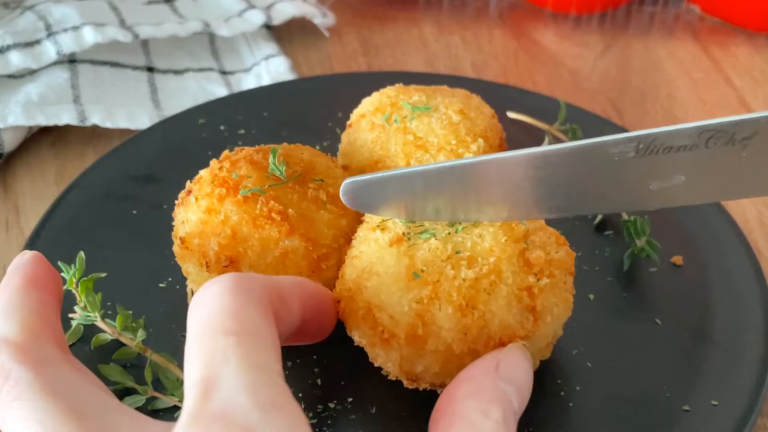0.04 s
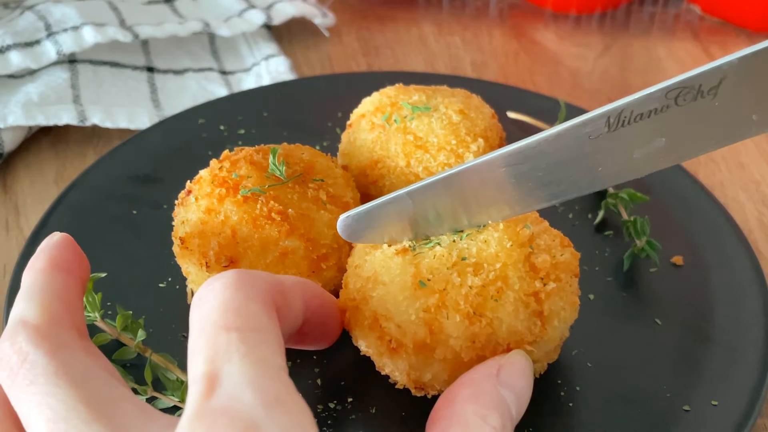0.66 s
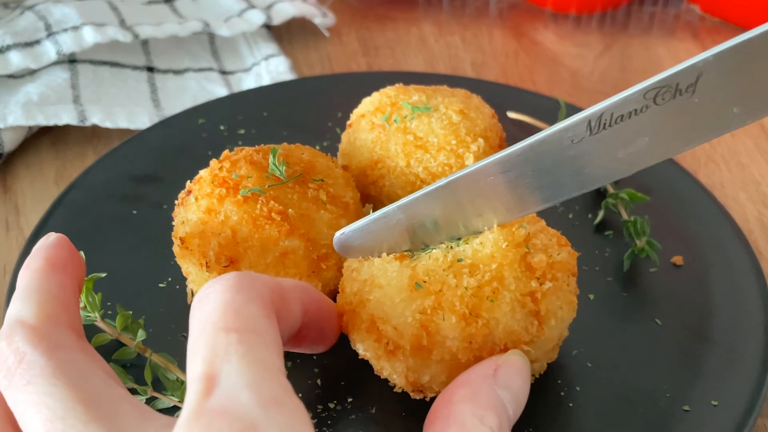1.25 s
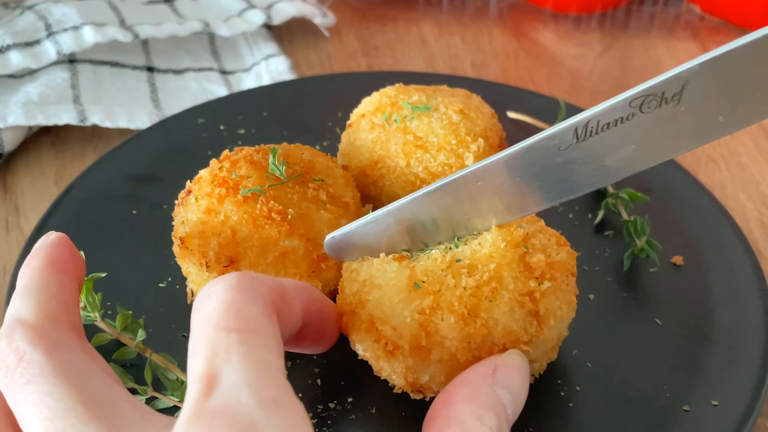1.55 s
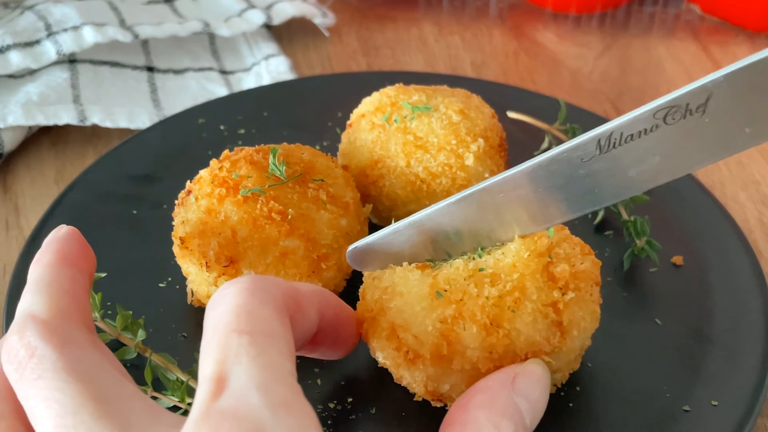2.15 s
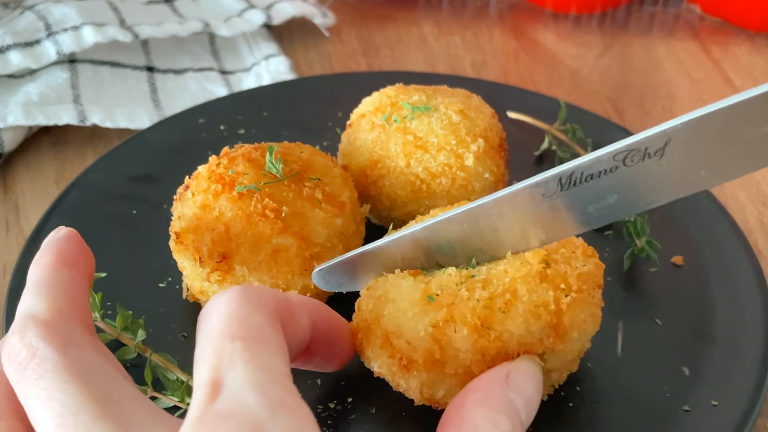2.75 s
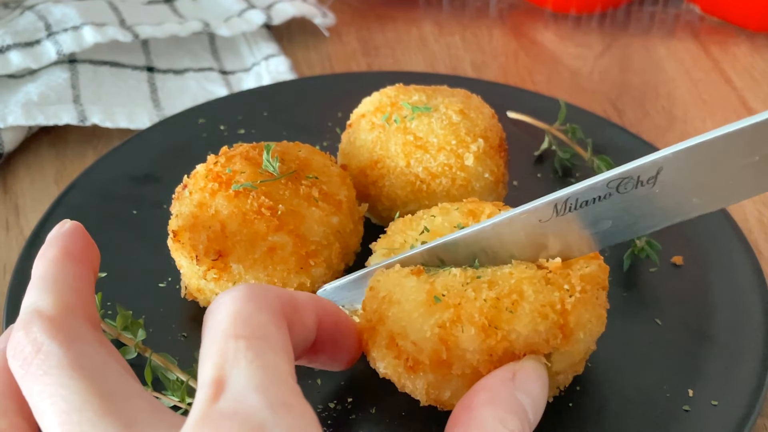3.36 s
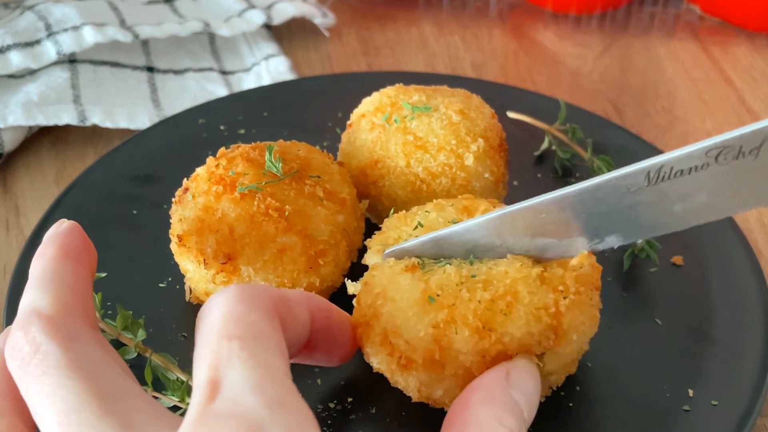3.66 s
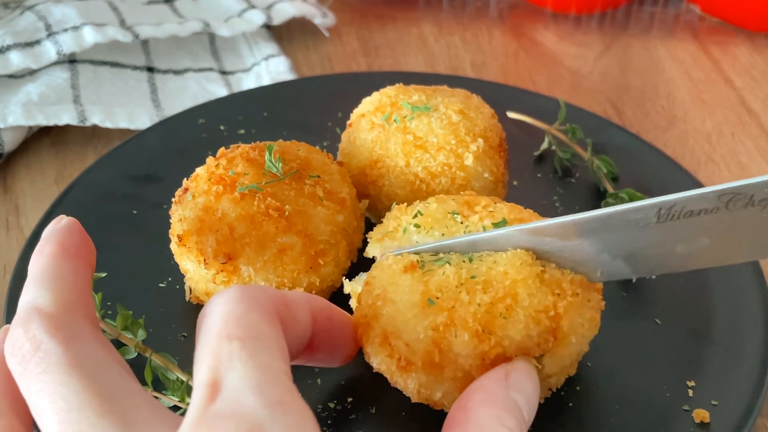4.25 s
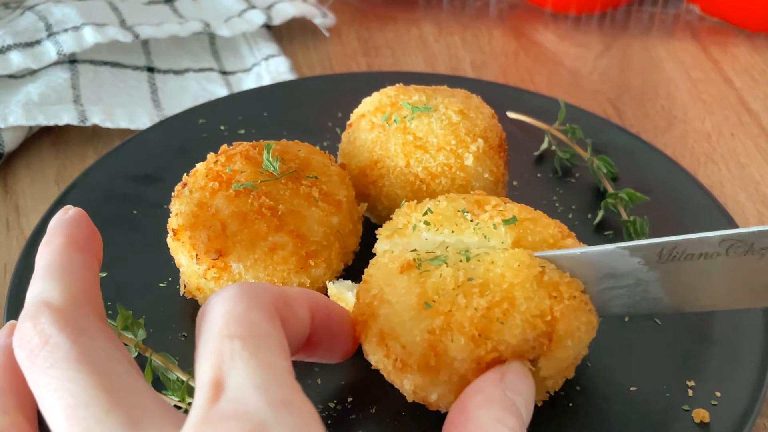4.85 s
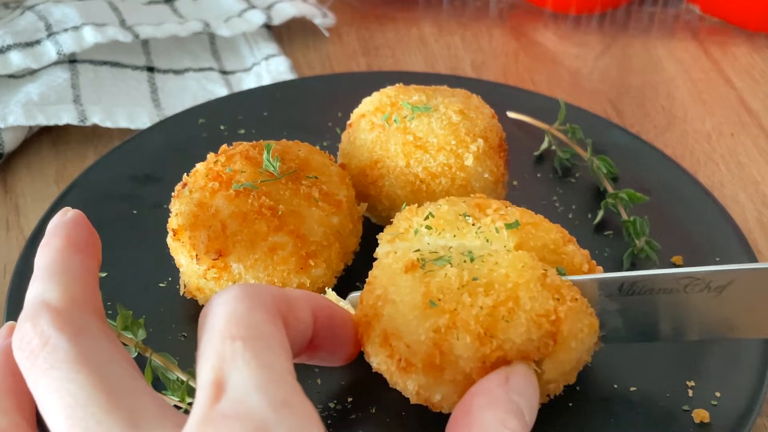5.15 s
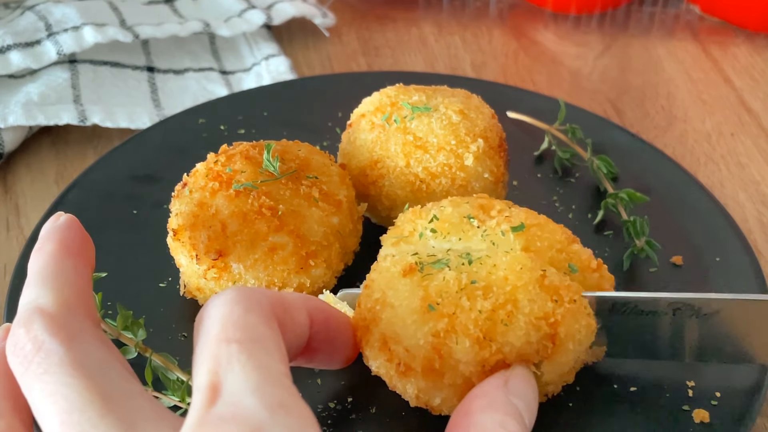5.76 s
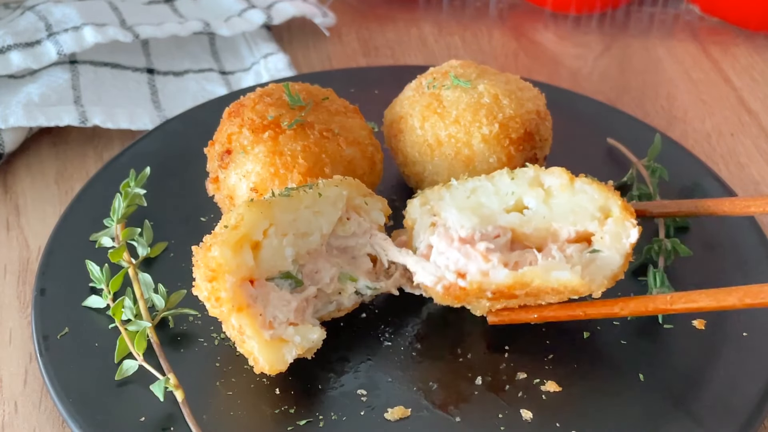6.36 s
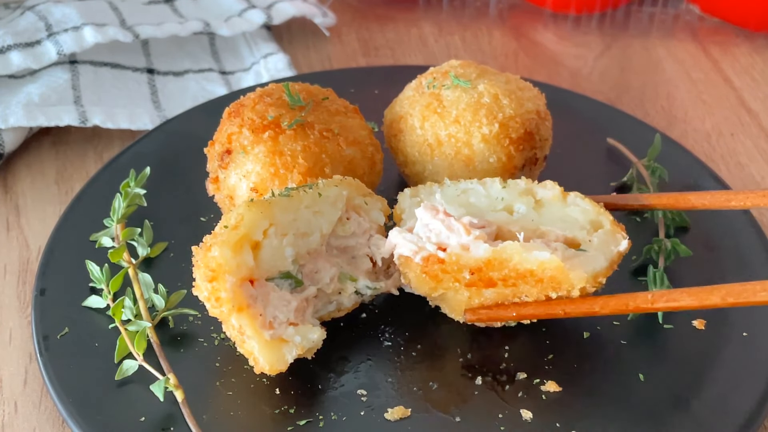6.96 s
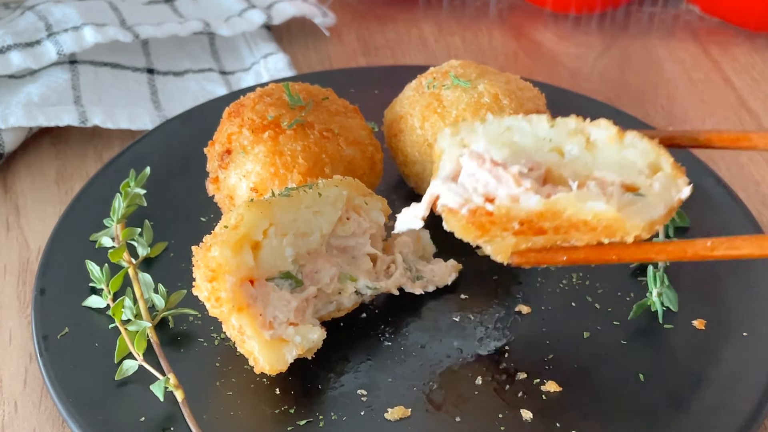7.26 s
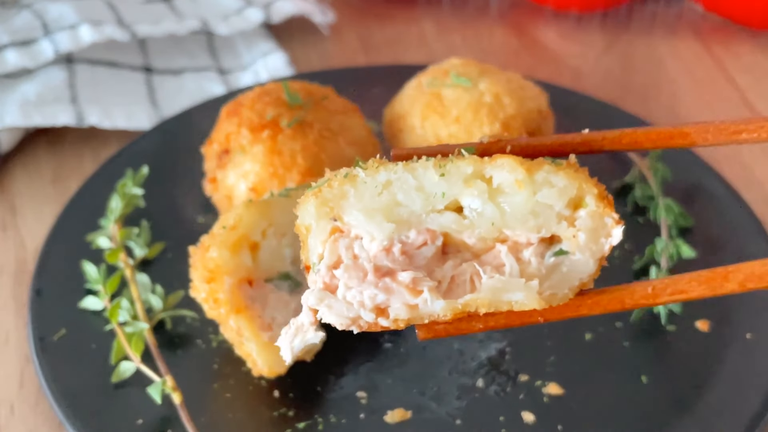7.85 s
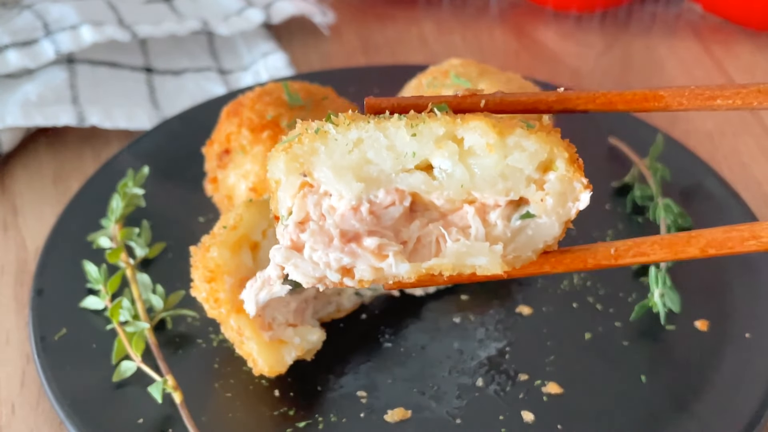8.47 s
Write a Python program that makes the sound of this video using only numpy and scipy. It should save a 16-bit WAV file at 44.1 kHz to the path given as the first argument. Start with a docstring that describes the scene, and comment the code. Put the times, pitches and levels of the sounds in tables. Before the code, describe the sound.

Close crunching of a breadcrumb crust under a knife, a scrape and clack on a ceramic plate, then soft sticky clicks of filling.

```python
"""A table knife saws through a breadcrumbed fried snack on a ceramic plate, very close.
The crust crackles and snaps as its flakes fracture; the blade rings faintly and its teeth rasp.
Each push rocks the table into a low boom. The blade drags on the plate, then clacks against it.
After a brief dropout, chopsticks tug the moist filling apart with sticky clicks, then tick.
Quiet room noise lies underneath."""
import sys
import numpy as np
from scipy import signal
from scipy.fft import rfft, irfft
from scipy.io import wavfile
from scipy.ndimage import uniform_filter1d

SR = 44100
rng = np.random.default_rng(int(sys.argv[2]) if len(sys.argv) > 2 else 0)


def pcm_store(signal):
    """Save signal as 16-bit PCM."""
    levels = np.round(np.clip(np.atleast_2d(signal), -1, 1) * 32767)
    wavfile.write(sys.argv[1], SR, levels.astype(np.int16).T)


N = 384047
TIME_S = np.arange(N) / SR
TAIL_S = np.arange(SR // 3) / SR
DROPOUT_START_S, DROPOUT_END_S = 5.904, 6.012


# start_s, length_s, crackle_db, tilt_db_per_octave, boom_db
KNIFE_STROKES = [(0.11, 0.028, -67.5, -3, -56), (0.22, 0.057, -68.5, -3.5, -87),
                 (0.33, 0.21, -72, 11, -58.5), (0.535, 0.11, -63, -1, -70.5), (0.68, 0.18, -67, -2.5, -62),
                 (0.9, 0.12, -75, 0, -78), (1.035, 0.12, -64.5, 2, -64), (1.29, 0.04, -63, -0.5, -65),
                 (1.42, 0.02, -56.5, -0.5, -54.5), (1.51, 0.071, -66, 1, -47), (1.73, 0.074, -67, 1.5, -87),
                 (1.87, 0.047, -63, -1, -62.5), (2.07, 0.38, -67.5, -1, -61), (2.31, 0.15, -57, -1, -43.5),
                 (2.5, .11, -57, 0, -44), (2.655, 0.067, -53, 0.5, -49.5), (2.915, 0.1, -56, -1.5, -54.5),
                 (3.095, 0.11, -58, -2.5, -47.5), (3.26, 0.075, -45, -4, -39.5),
                 (3.49, 0.13, -55, -1.5, -56), (3.725, 0.13, -50, -2, -47), (3.83, 0.18, -49, 1.5, -39.5),
                 (4.1, 0.11, -58, 0.5, -59), (4.365, 0.17, -47, 1.5, -39.5), (4.71, 0.13, -60.5, 0, -49.5),
                 (4.87, 0.39, -62.5, 1.5, -47), (5.035, 0.16, -53.5, 0.5, -56), (5.26, 0.38, -61, 2, -56.5),
                 (5.51, 0.12, -48.5, -2, -42.5), (5.76, 0.22, -63.5, 1, -53.5)]
# blade resting in the crust: time_s, crackle_db
REST_CRACKLE = [(0.1, -81.5), (1.5, -77.5), (2.3, -69), (5.8, -69.5)]
# freq_hz, density_db
CRUMB_SPECTRUM = [(100, -25), (480, -2.5), (750, -7), (1150, -3), (1950, -2), (3500, 3.5), (4300, -4.5),
                  (6100, -5), (7400, -7.5), (9500, -9), (11000, -17), (16000, -21)]

def crust():
    """Crumbs fracture under each stroke, and faintly under the resting blade."""
    return amp(-1.5) * crackle(KNIFE_STROKES, CRUMB_SPECTRUM, rate_per_s=1250, crowding=0.98,
                               spread_db=5, resonance_db=6.5, size_tilt=1.96,
                               rest=resting(curve(REST_CRACKLE)))


def crackle(moves, spectrum, rate_per_s, crowding, spread_db, resonance_db, size_tilt, rest=0):
    """Clumps of tiny fractures; more force breaks more pieces, and small ones sound brighter."""
    clumps = np.interp(TIME_S * 55, np.arange(2000), rng.uniform(-1, 1, 2000))  # 55 per second
    level = np.hypot(effort(moves), rest) * amp(3 * clumps)
    chance = rate_per_s * (level / amp(-58.5)) ** crowding / SR
    breaks = (rng.random(N) < chance) * rng.choice([-1, 1], N)
    breaks = breaks * amp(spread_db * np.minimum(rng.exponential(1, N), 4))
    clicks = []
    for pitch_hz in np.geomspace(800, 12000, 48):
        click = fragment(spectrum, pitch_hz, size_tilt * octaves(pitch_hz), resonance_db)
        clicks.append(unit_rms(np.convolve(click, fracture(crumble_ms=1, splintering=0.72))))
    kind, grains = rng.integers(0, len(clicks), N), np.zeros(N)
    for i in np.flatnonzero(breaks):
        add(grains, i / SR, breaks[i] * clicks[kind[i]])
    hz, frame_s, frames = signal.stft(grains, SR, nperseg=256)
    start_s, length_s, _, tilt, _ = np.transpose(moves)
    frames *= amp(octaves(hz)[:, None] * np.interp(frame_s, start_s + length_s / 2, tilt))
    tilted = signal.istft(frames, SR, nperseg=256)[1][:N]
    return level * steadied(tilted, window_s=0.025)


def fracture(crumble_ms, splintering):
    """The force of a break: one sharp release, then a dying cluster of splinters."""
    t_ms = 1000 * np.arange(SR // 50) / SR
    splinters = rng.standard_normal(len(t_ms)) * np.exp(-t_ms / crumble_ms)
    splinters[:4] = 0
    force = unit_energy(splinters) * splintering * (crumble_ms + 0.8)
    force[0] = -1
    return force


def fragment(spectrum, pitch_hz, tilt_db_per_octave, resonance_db):
    """The click of a flake or shred: a broad spectrum with one short resonance."""
    hz = np.fft.rfftfreq(2048, 1 / SR)
    resonance = np.exp(-(np.log2((hz + 1) / pitch_hz) / 0.42) ** 2)
    db = spectrum_db(spectrum, hz) + tilt_db_per_octave * octaves(hz) + resonance_db * resonance
    log_gain = np.log(amp(np.r_[db, db[-2:0:-1]]))
    minimum_phase = np.exp(np.conj(signal.hilbert(log_gain)))[:len(hz)]
    return unit_energy(irfft(minimum_phase)[:512])


# start_s, level_db, pitch_hz, crumble_ms
SNAPS_AND_CLICKS = [(0.377, -57.5, 1140, 2.9), (0.42, -61.5, 2680, 1.7), (0.4844, -54.5, 3260, 1.1),
                    (0.5232, -50.5, 2220, 3.9), (0.5547, -58, 970, 0.94), (0.614, -57, 6260, 1.2),
                    (0.682, -54, 1590, 4.1), (0.731, -55, 1530, 1.8), (0.746, -54.5, 1650, 1.9),
                    (0.8176, -48.5, 1850, 2.7), (0.9052, -58.5, 3000, 0.65), (0.9307, -60, 2860, 0.24),
                    (1.071, -60.5, 2920, 0.51), (1.1025, -55, 1350, 1.1), (1.1523, -57, 2630, 2.1),
                    (1.4928, -52.5, 3270, 6), (1.5172, -48.5, 3060, 5.1), (1.5502, -50.5, 2860, 0.63),
                    (1.5587, -47.5, 1270, 2.1), (1.6311, -55, 3100, 2.1), (1.7752, -58.5, 1130, 1.1),
                    (2.1464, -57.5, 2920, 3), (2.3072, -44, 3240, 3.4), (2.3478, -39.5, 2080, 5),
                    (2.386, -43, 3320, 1.7), (2.4302, -45.5, 3300, 5.9), (2.4889, -47.5, 3330, 3.3),
                    (2.576, -45.5, 3140, 2.5), (2.6493, -47.5, 3460, 3.2), (3.1155, -47, 1130, 3.2),
                    (3.1593, -46.5, 3300, 6.4), (3.2291, -45.5, 1340, 8.7), (3.4735, -54, 10200, 2.4),
                    (3.864, -43.5, 11000, 1.6), (3.9034, -41.5, 11100, 1.5), (3.979, -45.5, 2040, 3.4),
                    (4.0167, -48.5, 1070, 3.2), (4.0913, -51, 5240, 3.6), (4.1768, -48, 3420, 1.5),
                    (4.342, -43, 1380, 0.5), (4.3775, -38.5, 1290, 1.7), (4.3944, -37, 6260, 2.1),
                    (4.4783, -41.5, 7700, 0.78), (4.6725, -56.5, 3500, 1.1), (4.761, -51.5, 2920, 0.64),
                    (4.7989, -48, 4600, 0.22), (4.938, -52, 5720, 1.5), (5.0367, -45, 3340, 1.5),
                    (5.2781, -46, 1970, 0.39), (5.3882, -45.5, 4430, 0.43), (5.5033, -31, 4150, 12),
                    (5.5074, -47, 7440, 4.2), (5.553, -38.5, 6900, 0.63), (5.6026, -39.5, 6550, 2.5),
                    (5.6338, -48.5, 3960, 0.91), (5.6728, -50.5, 3600, 6.1), (5.7696, -53, 6580, 1.8),
                    (5.7868, -56, 5900, 0.72), (6.067, -57.5, 2130, 3.8), (6.095, -62, 2080, 1.8),
                    (6.4444, -50, 1820, 3.4), (6.7097, -55.5, 1730, 2.5), (7.1192, -54, 1800, 3.7),
                    (7.215, -60.5, 1920, 0.69), (7.296, -64.5, 8000, 1.2), (7.336, -64.5, 5700, 0.74)]
# time_s, tilt_db_per_octave
SNAP_BRIGHTNESS = [(0.4, 0), (2.5, 0), (4.4, 1), (5.2, 2), (5.6, 1.5), (7.2, 3)]
# freq_hz, density_db
SNAP_SPECTRUM = [(100, -23), (300, -9), (600, -6), (1200, -0.5), (2000, -2), (3500, -0.5), (4400, -8),
                 (6100, -6), (7500, -11.5), (10000, -14), (16000, -20.5)]

def snaps():
    """Sharp snaps of crust flakes during the cut, then sticky clicks as the filling pulls apart."""
    out = np.zeros(N)
    for start_s, level_db, pitch_hz, crumble_ms in SNAPS_AND_CLICKS:
        tilt = np.interp(start_s, *np.transpose(SNAP_BRIGHTNESS))
        click = fragment(SNAP_SPECTRUM, pitch_hz, tilt, resonance_db=8)
        snap = signal.fftconvolve(fracture(crumble_ms, splintering=0.98), click)
        add(out, start_s, amp(level_db) * unit_energy(snap) * np.sqrt(SR * 0.005))  # rms over 5 ms
    return out


# freq_hz, level_db, t60_s
BLADE_MODES = [(535, -8, 0.045), (1160, 5.5, 0.0058), (2150, -16, .04), (2672, -17, 0.035),
               (3900, -15, .03), (5100, -13, 0.04), (6126, 4.5, 0.02), (7550, 5, 0.009), (8190, -14, 0.04),
               (10030, 1, 0.035), (11100, -7, 0.019), (12680, -2, .03), (14720, -7, .045)]
# rasp relative to the stroke: time_s, gain_db
TOOTH_BITE = [(0, -23), (2.3, -22), (2.95, -6), (3.3, -11), (3.8, -12), (4.5, -28), (5, -43)]

def blade(breaking, catches_per_s=260):
    """Breaks ring the blade; teeth catch on crumbs and pluck its top modes into a thin zing."""
    catches = rng.standard_normal(N) * (rng.random(N) < catches_per_s / SR)
    rasp = filtered(excite(catches, BLADE_MODES), 9000, "high", order=4)
    zing = effort(KNIFE_STROKES) * amp(curve(TOOTH_BITE)) * unit_rms(rasp)
    return zing + amp(-8) * excite(breaking * (TIME_S < DROPOUT_START_S), BLADE_MODES)


# freq_hz, level_db, t60_s (before damping)
PLATE_MODES = [(791, -5.5, .13), (991, -4.5, .13), (1100, -6, .08), (1680, -10, .08), (2110, -3, .07),
               (2200, -2, .08), (3210, -8, .09), (3740, -3, .04), (3870, -2, .04), (3985, 2, .09),
               (4480, -13, .07), (5530, -9, .05), (5980, -9, .05), (6715, -5, .06), (6820, 0, .08),
               (6910, -5, .08), (7380, -2, .08), (8290, -12, .05), (10400, -13, .14), (11190, -16, .08),
               (14240, -18, .1)]
# start_s, relative_db, low_modes_db
PLATE_KNOCKS = [(1.702, -62, -17), (1.7438, -51, -35), (1.825, -59, -28), (2.237, -48.5, -26),
                (2.349, -41, -14), (3.359, -50, -9), (5.0366, -43.5, -3), (5.078, -42, -2),
                (5.1678, -51, -9), (5.3901, -43, -24.5), (5.4109, -47.5, -9), (5.433, -49, -2.5),
                (5.494, -43.5, 0), (5.5088, -24, 1.5), (5.529, -34, 4), (5.5501, -36.5, -7.5),
                (5.6047, -39, 10), (6.353, -63, -11), (6.561, -60.5, -7)]

def plate_knocks():
    """The plate, damped by the food on it, rings briefly, rattles on the table and grinds crumbs."""
    out = np.zeros(N)
    white = rng.standard_normal((len(PLATE_KNOCKS), len(TAIL_S)))
    for (start_s, relative_db, low_db), burst in zip(PLATE_KNOCKS, white):
        ringing = ring(PLATE_MODES, low_db, damping=1.3, random_spot=True)
        rattle = amp(low_db) * unit_rms(filtered(burst, [550, 1500], "band")) * decay(t60_s=0.024)
        grit = amp(-7) * unit_rms(filtered(burst, [1800, 6500], "band")) * decay(t60_s=0.035)
        add(out, start_s, amp(relative_db - 6) * (ringing + rattle + grit))
    return out


# start_s, length_s, ring_db, rub_db
BLADE_DRAGS = [(1.89, 0.05, -64.5, -71), (2.25, 0.23, -68, -65), (4.8, 0.38, -70, -62.5),
               (5.04, 0.15, -80, -52.5), (5.25, 0.53, -78, -62), (5.51, 0.07, -53.5, -52),
               (5.7, 0.28, -74, -64)]

def plate_scrape(slips_per_s=700):
    """The plate sings as the teeth slip over it."""
    slips = (rng.random(N) < slips_per_s / SR) * rng.standard_normal(N)
    ringing = ring(PLATE_MODES, low_db=-9, corner_hz=1970, random_spot=True)
    scrape = signal.oaconvolve(slips, ringing)[:N]
    return effort(BLADE_DRAGS) * steadied(scrape, window_s=0.04)


# start_s, length_s, crackle_db, tilt_db_per_octave, boom_db
FILLING_TUGS = [(6.011, 0.15, -72.5, -2.5, -59.5), (6.234, 0.21, -73, 0.5, -67),
                (6.427, 0.012, -54.5, 2, -67), (6.546, 0.018, -85, -6, -66),
                (6.642, 0.091, -66.5, 0.5, -62), (6.898, 0.2, -71.5, 1.5, -70), (7.2, 0.14, -79, 6, -78)]
# freq_hz, density_db
FILLING_SPECTRUM = [(100, -26), (700, -13), (1200, -13), (1800, 5), (2500, -3.5), (3300, 6), (4600, -11.5),
                    (5700, -1), (7500, -15), (16000, -22)]

def filling():
    """The moist filling parts in small resonant clicks under each tug."""
    return amp(4.5) * crackle(FILLING_TUGS, FILLING_SPECTRUM, rate_per_s=2000, crowding=0.5,
                              spread_db=7, resonance_db=14, size_tilt=1)


# start_s, relative_db
CHOPSTICK_TICKS = [(7.401, -67), (8.3104, -57.5), (8.349, -65), (8.4259, -52.5)]
# freq_hz, level_db, t60_s
CHOPSTICK_MODES = [(2970, 4.5, 0.0092), (4360, 2.5, 0.00077), (6030, -13, 0.0048), (11500, -8, 0.00056)]

def chopsticks():
    """Tapped wood gives short, hollow ticks."""
    out = np.zeros(N)
    for start_s, relative_db in CHOPSTICK_TICKS:
        add(out, start_s, amp(relative_db + 8) * ring(CHOPSTICK_MODES, phase_rad=1.4))
    return out


# freq_hz, density_db
RUB_SPECTRUM = [(25, -6.5), (110, 4.5), (170, 4), (280, 3.5), (380, -4.5), (510, 3), (680, -6), (950, -11),
                (1500, -21), (4000, -59)]

def table(mode_hz=65, width_hz=8, skirt_hz=24):
    """The unsteady push rocks the table at its low mode and rubs snack and blade on the plate."""
    offset_hz = np.fft.rfftfreq(N, 1 / SR) - mode_hz
    mode = 1 / (1 + 2j * offset_hz / width_hz) / (1 + (offset_hz / skirt_hz) ** 4)
    boom = irfft(rfft(rng.standard_normal(N)) * mode, N)
    moving = effort(KNIFE_STROKES + FILLING_TUGS, column=4, lag_s=0.011, release_db_per_s=286)
    push = np.hypot(moving, resting(-70))
    rubbing = np.hypot(push * amp(-17), effort(BLADE_DRAGS, column=3))
    return push * amp(1) * steadied(boom, window_s=0.05) + rubbing * noise(RUB_SPECTRUM)


def reflections(x, echoes_per_s=3000, delay_s=0.004, cutoff_hz=5000):
    """The room scatters a short, dull tail."""
    taps = rng.standard_normal(len(TAIL_S)) * (rng.random(len(TAIL_S)) < echoes_per_s / SR)
    taps *= (TAIL_S > delay_s) * decay(t60_s=0.14)
    tail = filtered(unit_energy(taps), cutoff_hz, "low", order=1)
    return signal.oaconvolve(x, tail)[:N]


# freq_hz, density_db
ROOM_SPECTRUM = [(20, 2), (35, -9), (70, -9.5), (105, -18), (160, -18.5), (340, -23.5), (1000, -31),
                 (2300, -38), (6000, -41.5), (16000, -44)]
# time_s, gain_db
ROOM_SWELL = [(0, 4.5), (1.2, 7.5), (5.8, 12), (7.2, 8.5), (8, 10.5)]

def room_noise():
    """A faint rumble and hiss that slowly swells and eases."""
    return amp(-70 + curve(ROOM_SWELL)) * noise(ROOM_SPECTRUM)


def effort(moves, column=2, lag_s=0, attack_s=0.018, arch_db=3.5, release_db_per_s=354):
    """Gain of hand movements: each swells, arches to the dB level in its column and dies away."""
    power = np.zeros(N)
    for move in moves:
        start_s, length_s = move[:2]
        t = TIME_S - start_s - lag_s
        attack = np.clip(t / attack_s + 0.5, 0, 1)
        arch = np.sin(np.pi * np.clip(t / length_s, 0, 1))
        release_db = release_db_per_s * np.clip(t - length_s, 0, 1)
        power += (attack * amp(move[column] + arch_db * (arch - 1) - release_db)) ** 2
    return np.sqrt(power)


def resting(db):
    """Gain while the blade is in the crust, zero otherwise."""
    return amp(db) * (TIME_S > KNIFE_STROKES[0][0]) * (TIME_S < DROPOUT_START_S)


def ring(modes, low_db=0, corner_hz=1500, damping=1, phase_rad=0, random_spot=False):
    """Dying sines; a heavy blow feeds the low modes, and the spot struck sets their signs."""
    signs = rng.choice([-1, 1], len(modes)) if random_spot else np.ones(len(modes))
    out = np.zeros(len(TAIL_S))
    for (hz, level_db, t60_s), sign in zip(modes, signs):
        gain = sign * amp(level_db + low_db / (1 + (hz / corner_hz) ** 4))
        out += gain * decay(t60_s / damping) * np.sin(2 * np.pi * hz * TAIL_S + phase_rad)
    return out


def excite(x, modes):
    """Drives modes with a sound, roughly keeping its power."""
    return signal.oaconvolve(x, unit_energy(ring(modes, phase_rad=0.87)))[:N]


def noise(spectrum):
    """Shaped noise at rms 1."""
    gain = amp(spectrum_db(spectrum, np.fft.rfftfreq(N, 1 / SR)))
    return unit_rms(irfft(rfft(rng.standard_normal(N)) * gain, N))


def steadied(x, window_s):
    """Holds the running rms near 1."""
    x, size = unit_rms(x), int(window_s * SR)
    power = uniform_filter1d(uniform_filter1d(x ** 2, size), size)
    return x / np.sqrt(abs(power) + 1e-6)


def octaves(hz):
    """Distance from the middle of the crunch, flat in the bass."""
    return np.log2(np.maximum(hz, 800) / 3000)


def spectrum_db(spectrum, hz):
    freq_hz, density_db = np.transpose(spectrum)
    return np.interp(np.log(hz + 1), np.log(freq_hz), density_db)


def filtered(x, edges_hz, kind, order=2):
    return signal.sosfilt(signal.butter(order, edges_hz, kind, fs=SR, output="sos"), x)


def decay(t60_s):
    return amp(-60 * TAIL_S / t60_s)


def curve(points):
    return np.interp(TIME_S, *np.transpose(points))


def amp(db):
    return 10 ** (np.asarray(db) / 20)


def unit_rms(x):
    return x / np.sqrt(np.mean(x ** 2) + 1e-20)


def unit_energy(x):
    return x / np.linalg.norm(x)


def add(mix, start_s, sound):
    part = mix[round(start_s * SR):][:len(sound)]
    part += sound[:len(part)]


def scene():
    """Close sources and their reflections over the table's boom and the room noise, in mono."""
    crumbs, tearing = crust(), filling()
    breaking = crumbs + snaps()
    near = breaking + tearing + blade(breaking) + plate_knocks() + plate_scrape() + chopsticks()
    return (near + room_noise() + amp(-13) * reflections(near) + table())[None]


def record(dry, cutoff_hz=16100):
    """A brief dropout, then a steep low-pass."""
    gate = uniform_filter1d(1.0 * ((TIME_S < DROPOUT_START_S) | (TIME_S > DROPOUT_END_S)), size=64)
    lowpass = signal.firwin(511, cutoff_hz, window=("kaiser", 9), fs=SR)
    return signal.oaconvolve(dry * gate, lowpass[None], "same")


dry = scene()
out = record(dry)
pcm_store(out)
```